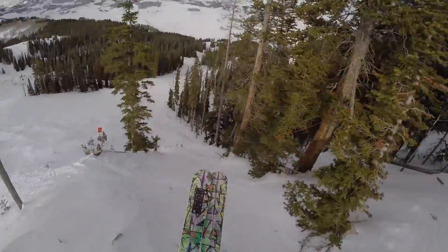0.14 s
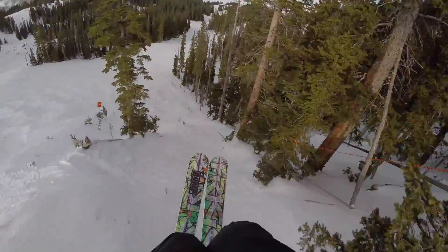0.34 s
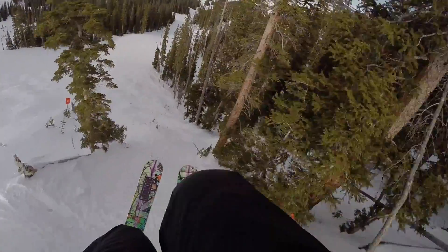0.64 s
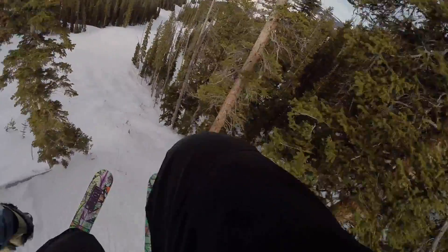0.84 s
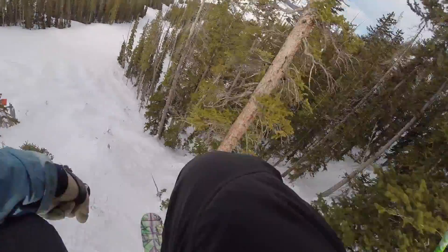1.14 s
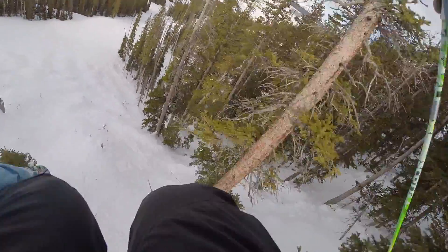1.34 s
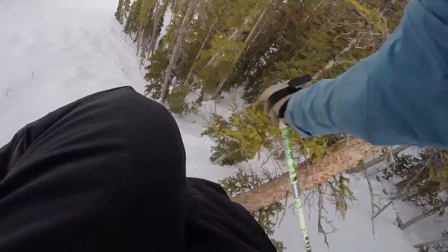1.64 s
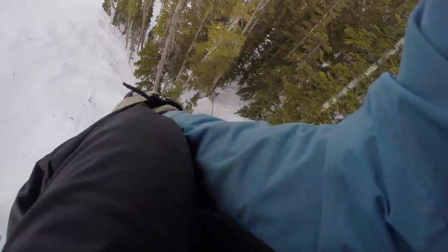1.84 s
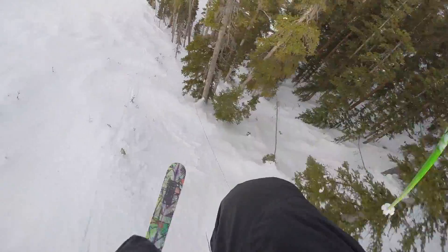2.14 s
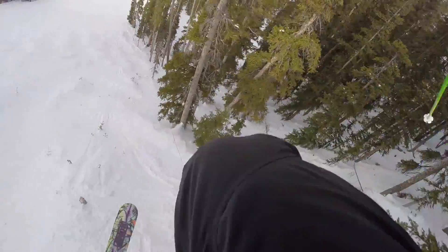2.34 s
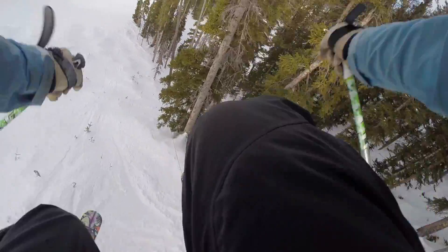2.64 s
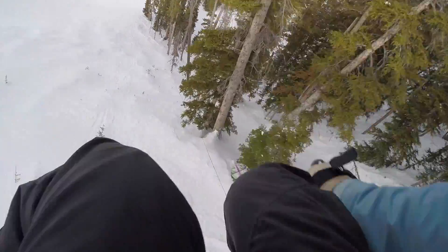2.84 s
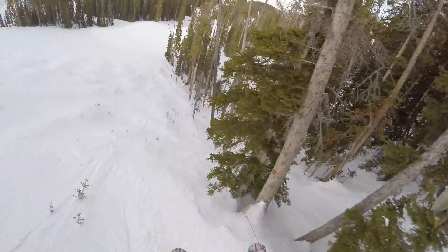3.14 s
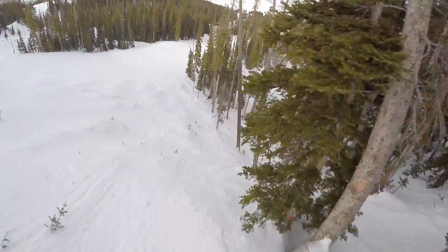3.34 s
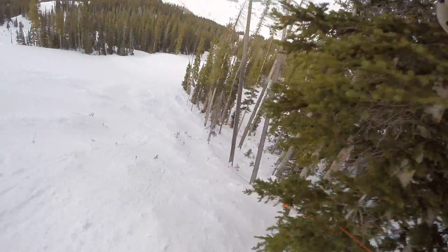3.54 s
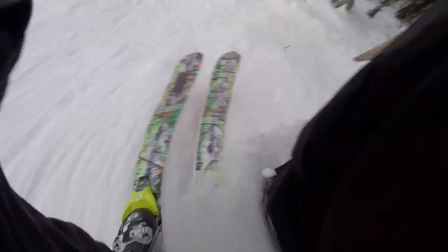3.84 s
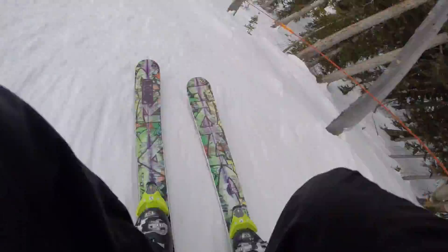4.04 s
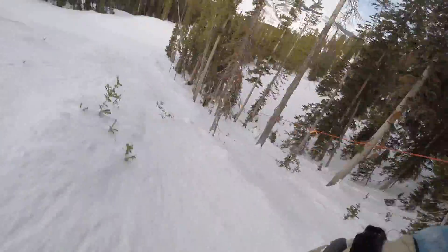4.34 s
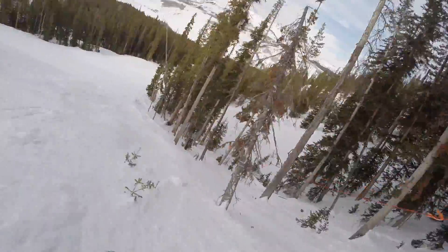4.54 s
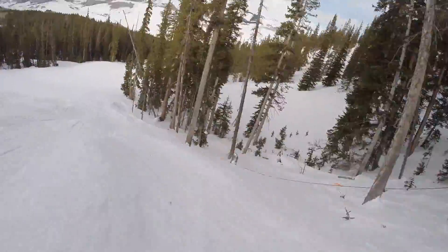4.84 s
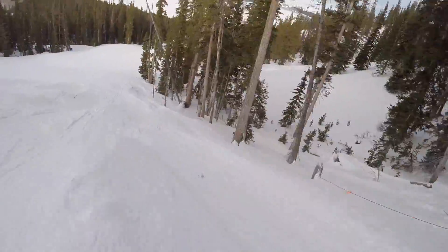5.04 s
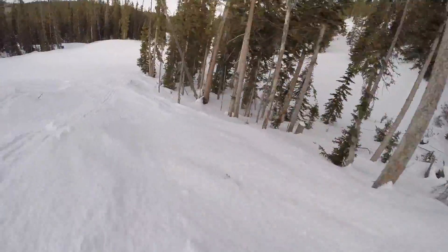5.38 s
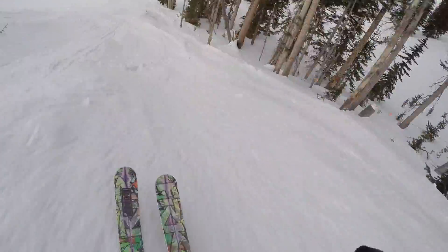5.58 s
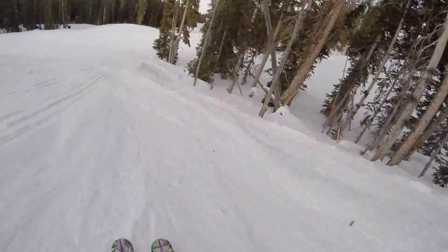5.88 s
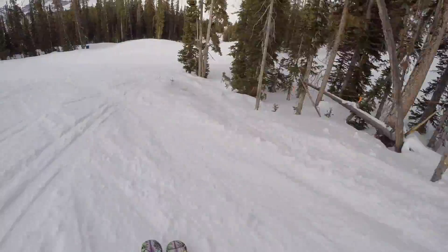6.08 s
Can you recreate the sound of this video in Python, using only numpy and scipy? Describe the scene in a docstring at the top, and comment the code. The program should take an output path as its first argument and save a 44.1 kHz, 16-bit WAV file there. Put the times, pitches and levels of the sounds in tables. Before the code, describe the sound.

Skis on a snowy slope heard through a shaking camera housing. At first everything is half-speed: an opening thump, then faint low scraping, muffled rumbles and sparse hollow knocks. A sudden heavy landing near 3.85 seconds overloads the microphone with bass wind, rapid thuds, plastic clatter and snow crunch. It drops quickly to a brighter normal-speed glide, with dry hiss, short skids, mount bumps, wind puffs and hard clicks. No echo.

```python
"""On a slope of packed snow a skier jumps and skids, a small camera in a plastic housing on the chest.
Wind is lumpy bass noise on the microphone port; the rocking mount booms as wavering narrow-band noise.
Jolts are short dying swings with a plate thud, and contacts strike the resonant modes of the housing.
The skis scrape as coloured noise with a port resonance and throw spray, a bright crackling hiss.
The first seconds are played back at half speed, so everything there is an octave lower and twice as long."""
import sys
import numpy as np
from scipy import signal
from scipy.fft import rfft, irfft, next_fast_len
from scipy.io import wavfile
from scipy.ndimage import uniform_filter1d

SR = 44100
rng = np.random.default_rng(int(sys.argv[2]) if len(sys.argv) > 2 else 0)


def unload_wav(signal):
    """Save mono or channel-first audio to the path in sys.argv[1] as 16-bit WAV at rate SR, clipped to [-1, 1]."""
    wavfile.write(
        sys.argv[1],
        SR,
        np.round(np.clip(np.atleast_2d(signal).T, -1, 1) * 32767).astype(np.int16),
    )


N = 273861   # samples heard
SLOW_UNTIL_S, SLOW_SPEED = 3.8165, 0.5   # heard end of the slow part, and its playback speed
SLOW_COUNT = round(SLOW_UNTIL_S * SR * SLOW_SPEED)   # samples at true speed
TRUE_COUNT = SLOW_COUNT + N - round(SLOW_COUNT / SLOW_SPEED)


def amp(db):
    """Decibel law: a level in dB becomes an amplitude ratio."""
    return 10 ** (np.asarray(db) / 20)


def rms_one(x):
    """Normalisation: the root mean square becomes 1."""
    return x / np.sqrt(np.mean(x ** 2) + 1e-20)


def speed_at(s):
    """Time scaling: playback speed at a heard time."""
    return np.where(np.asarray(s) < SLOW_UNTIL_S, SLOW_SPEED, 1)


def true_time(s):
    """Time scaling: the moment on the slope that is heard at time s."""
    return s - (1 - SLOW_SPEED) * np.minimum(s, SLOW_UNTIL_S)


def curves(rows):
    """Linear interpolation: columns over heard time, read at every sample of true time."""
    s, *columns = np.transpose(rows)
    t = np.arange(TRUE_COUNT) / SR
    return [np.interp(t, true_time(s), column) for column in columns]


def drift(rate_hz):
    """Low-passed noise: a slow random signal of rms 1 that changes about rate_hz times a second."""
    r = np.exp(-2 * np.pi * rate_hz / SR)
    noise = rng.standard_normal(TRUE_COUNT + SR)
    settled = signal.lfilter([1], [1, -2 * r, r * r], noise)[SR:]
    return rms_one(settled)


def coloured(x, spectrum):
    """Spectral shaping: gains in dB, straight between points on a log frequency axis; rms 1."""
    size = next_fast_len(len(x))
    hz, level_db = np.transpose(spectrum)
    grid_hz = np.maximum(np.arange(size // 2 + 1) * SR / size, 1)
    gain_db = np.interp(np.log(grid_hz), np.log(hz), level_db, -99, -99)
    return rms_one(irfft(rfft(x, size) * amp(gain_db), size)[:len(x)])


def evened(x, span_s, share):
    """Level compression: takes a share of the random swings out of the level; rms 1."""
    power = uniform_filter1d(x ** 2, size=round(span_s * SR)) + 0.041
    return rms_one(x / power ** (np.clip(share, 0, 1) / 2))


def ring(x, hz, t60_s):
    """Damped resonance: a unit impulse excites a dying sine of height about 1."""
    r, w = amp(-60 / (t60_s * SR)), 2 * np.pi * hz / SR
    # the tiny offset keeps the filter state out of denormal numbers
    return signal.lfilter([0, np.sin(w)], [1, -2 * r * np.cos(w), r * r], x + 1e-18)


def grit(per_s, spread_db, grain_db):
    """Shot noise: random snow grains of uneven size crack within smooth noise."""
    sizes = amp(spread_db * np.minimum(rng.exponential(1, TRUE_COUNT), 5))
    signs = rng.choice([-1, 1], TRUE_COUNT)
    present = rng.random(TRUE_COUNT) < per_s / SR
    grains = sizes * signs * present
    return rng.standard_normal(TRUE_COUNT) + amp(grain_db) * rms_one(grains)


# wind spectrum at true speed: frequency [Hz], relative density [dB per Hz]
WIND_SPECTRUM = [(12, 7), (25, 9), (60, -1.5), (110, -8.5), (300, -13.5), (500, -34.5), (900, -44.5)]


def wind(gain):
    """Turbulence: eddies on the microphone port make lumpy bass noise."""
    eddies = evened(coloured(rng.standard_normal(TRUE_COUNT), WIND_SPECTRUM), span_s=0.057, share=0.81)
    return gain * rms_one(amp(5.05 * drift(25.0)) * eddies)


def boom(gain, pitch_hz=150, width_hz=60):
    """Randomly driven resonance: the mount rocks near one pitch and shaking makes it waver."""
    turn = 2 * np.pi * pitch_hz * np.arange(TRUE_COUNT) / SR
    rocking = drift(width_hz) * np.cos(turn) + drift(width_hz) * np.sin(turn)
    return gain * evened(rocking, span_s=0.098, share=0.1)


# bumps under the skis, where an edge bites and the mount rocks, as heard:
# middle_s [s], length_s [s], crunch_db [dB], rocking_db [dB]
BUMPS = [(0.108, 0.06, -16.5, -16), (0.23, 0.084, -36, -31), (0.59, .2, -77, -58), (0.91, 0.051, -52, -57),
         (1.213, .12, -61, -38), (1.325, 0.2, -40.5, -44), (1.603, 0.5, -48, -36.5), (1.75, 0.39, -32, -27),
         (1.978, 0.21, -37.5, -29), (2.132, 0.18, -37.5, -33), (2.268, 0.11, -45, -40),
         (2.335, 0.23, -32.5, -34), (2.611, 0.22, -44, -30.5), (2.712, .12, -56.5, -34.5),
         (2.927, 0.17, -41, -30), (3.15, 0.17, -44.5, -42), (3.322, 0.24, -38.5, -60),
         (3.53, 0.26, -42, -35), (3.59, 0.31, -36.5, -38), (3.772, 0.068, -29, -38),
         (3.879, 0.038, -3.5, 4.5), (3.948, 0.029, -15, -2.5), (4.218, 0.12, -35.5, -27),
         (4.345, .08, -47, -30.5), (4.5, 0.033, -29.5, -29), (4.629, 0.093, -36, -19.5),
         (4.745, 0.093, -23, -18), (4.877, 0.27, -47, -31), (5.202, 0.25, -38.5, -41.5),
         (5.32, 0.14, -36, -30), (5.412, 0.052, -28.5, -22.5), (5.471, 0.046, -28, -23),
         (5.538, 0.08, -25, -22), (5.631, 0.073, -22.5, -17), (5.707, .05, -54, -29),
         (5.798, 0.031, -39, -38), (5.875, .05, -41, -30), (5.94, 0.11, -33, -37), (5.993, 0.02, -27, -19)]


def swells(levels_db, share, extra_s):
    """Superposed envelopes: one bell per bump; its width is a share of the length plus extra_s."""
    total, t = 0, np.arange(TRUE_COUNT) / SR
    for (s, length, *_), level_db in zip(BUMPS, levels_db):
        width = (share * length + extra_s) * speed_at(s)
        total = total + amp(level_db) * np.exp(-.5 * ((t - true_time(s)) / width) ** 2)
    return total


# jolts through the mount, as heard: start_s [s], level_db [dB], pitch_hz [Hz], t60_s [s]
MOUNT_JOLTS = [(0.085, -5, 50, 0.04), (0.104, -7, 43, 0.22), (1.659, -9.5, 60.3, 0.016),
               (1.714, -8.5, 117, 0.066), (1.802, -9.5, 92, 0.13), (1.953, -17, 131, 0.14),
               (1.982, -11.5, 166.6, 0.12), (2.225, -12.5, 51, 0.23), (2.275, -16.5, 107, 0.083),
               (3.821, 3, 112, 0.08), (3.852, 6, 98, 0.083), (3.893, 6.5, 138, 0.03),
               (3.914, -6, 102, 0.091), (3.938, 9, 78.5, 0.051), (3.977, 0, 108, 0.022),
               (4.214, -4.5, 92, 0.041), (4.486, -15.5, 157, 0.033), (4.62, -23, 122, 0.058),
               (4.635, -7, 91, 0.11), (4.716, -1, 64.5, 0.094), (4.765, -17, 110, 0.057),
               (5.468, -4.5, 248, 0.026), (5.511, -0.5, 73, 0.051), (5.625, 0.5, 291, 0.04),
               (5.96, -24, 150, 0.022), (5.988, -0.5, 196, 0.023)]
# modes of the harness plate under the mount, at true speed: pitch_hz [Hz], level_db [dB], t60_s [s]
HARNESS_PLATE = [(515, -14, 0.02), (772, -10.5, 0.013), (1080, -17, 0.011)]


def jolts():
    """Free decay: a jolt throws the mount into a short dying swing and the harness plate thuds."""
    out, t = np.zeros(TRUE_COUNT + SR), np.arange(SR // 4) / SR
    rise = 1 - np.exp(-t / 0.0022)
    thud = 0
    for hz, mode_db, t60_s in HARNESS_PLATE:
        thud = thud + amp(mode_db - 60 * t / t60_s) * np.sin(2 * np.pi * hz * t)
    for s, level_db, hz, t60_s in MOUNT_JOLTS:
        speed, at = speed_at(s), round(true_time(s) * SR)
        swing = amp(-60 * t / (t60_s * speed)) * np.sin(2 * np.pi * hz / speed * t)
        out[at:at + len(t)] += rise * amp(level_db) * (swing + thud)
    return out[:TRUE_COUNT]


TICK_COUNT, TICK_SPREAD_DB = 24, 9.5   # spread either way
TICK_OFFSETS_DB = [-4.5, 2, -1.5]   # knock, snap, fizz against the glide


def ticks(glide_db):
    """Random impacts: faint contacts at random moments of random bumps, their level following the glide."""
    luck = rng.random((TICK_COUNT, 5))
    chosen = (luck[:, 0] * len(BUMPS)).astype(int)
    middle, length = np.array(BUMPS)[chosen, :2].T
    s = middle + length * (luck[:, 1] - .5)
    base_db = glide_db[(true_time(s) * SR).astype(int), None]
    level_db = base_db + TICK_SPREAD_DB * (2 * luck[:, 2:] - 1)
    return np.column_stack([s, level_db + TICK_OFFSETS_DB])


# mount and buckle contacts, as heard; levels of the blow to each band of modes:
# start_s [s], knock_db [dB], snap_db [dB], fizz_db [dB]
CONTACTS = [(0.086, -13, -45, -46), (0.093, -40, -27, -23.5), (0.105, -10, -42, -29),
            (0.139, -14.5, -18.5, -23.5), (0.298, -31, -34.5, -38), (0.73, -25, -33.5, -41),
            (1.189, -22.5, -39, -42.5), (1.834, -25.5, -54, -40), (2.228, -23.5, -48, -68),
            (2.273, -21, -39, -46), (2.284, -26, -36, -38), (2.383, -21, -37, -43),
            (2.391, -19, -23.5, -36.5), (2.956, -20, -40, -39), (3.169, -29, -32, -32),
            (3.183, -5, -16, -13.5), (3.57, -26, -30, -38), (3.744, -25, -33, -67), (3.77, -28, -29, -45),
            (3.779, -34, -36, -38), (3.803, -5.5, -17.5, -30), (3.8145, -9, -23, -32),
            (3.817, -3.5, -12, -23), (3.837, -10, -32, -19), (3.855, 6.5, -10, -17), (3.861, -29, -9, -27),
            (3.878, -7.5, -24, -30), (3.897, -4, -21, -38), (3.906, 1.5, -25, -32), (3.94, 3.5, -24, -3.5),
            (3.957, -17, -21, -36), (3.977, -6, -23, -33), (3.998, -34, -26, -20), (4.018, -11.5, -9, -10),
            (4.108, -40, -32, -28), (4.215, -20.5, -30.5, -38), (4.434, -20, -28, -49),
            (4.72, -11, -21.5, -40), (4.764, -14, -25, -25), (4.818, -11, -25.5, -41), (4.955, 5, -2, -17),
            (5.209, -40, -32, -34), (5.379, -18.5, -31, -44), (5.52, -10, -20, -26.5),
            (5.629, -32, -23, -19.5), (5.703, -9, -30, -57), (5.787, -23, -32, -22), (5.926, -26, -41, -30),
            (6.08, -1, 6.5, -19)]
# housing modes at true speed: pitch_hz [Hz], level_db [dB], t60_s [s]
HOUSING_MODES = [(725, -18.5, 0.01), (768, -20.5, 0.022), (990, -15.5, 0.0094), (1810, -9, 0.0094),
                 (2065, -16, 0.043), (2323, -3, 0.012), (2790, 0, 0.0051), (3514, -2.5, 0.011),
                 (4317, 1.5, 0.0082), (5250, -2, 0.0096), (6140, -8.5, 0.013), (7400, -1, 0.0039),
                 (8930, -0.5, 0.0034), (11460, -3.5, 0.0024), (13030, -10.5, 0.0019), (15140, -6, 0.00067)]
# a knock rings the modes below the first bound, a snap those between, a fizz the top
SNAP_FROM_HZ, FIZZ_FROM_HZ = 3200, 7000


def clicks(glide_db, contact_ms=1.0, rough=0.12):
    """Modal excitation: a hard tick with a short rough tail strikes each housing mode with its own strength."""
    s, knock_db, snap_db, fizz_db = np.transpose(np.vstack([CONTACTS, ticks(glide_db)]))
    span = np.arange(300)
    tail = np.exp(-span / (contact_ms * SR / 1000))
    bursts = rough * rng.standard_normal((len(s), len(span))) * tail
    bursts[:, 0] = 1
    at = np.round(true_time(s) * SR).astype(int)[:, None] + span
    luck_db = 1.5 * rng.standard_normal((len(s), len(HOUSING_MODES)))
    out = np.zeros(TRUE_COUNT)
    for k, (hz, mode_db, t60_s) in enumerate(HOUSING_MODES):
        blow_db = knock_db if hz < SNAP_FROM_HZ else snap_db if hz < FIZZ_FROM_HZ else fizz_db
        strength = (-1) ** k * amp(blow_db + mode_db + luck_db[:, k])   # signs alternate between modes
        force = np.zeros(TRUE_COUNT)
        np.add.at(force, at, bursts * strength[:, None])
        out += ring(force, hz, t60_s)
    return out


# spray spectrum at true speed: frequency [Hz], relative density [dB per Hz]
SPRAY_SPECTRUM = [(1500, -14), (3000, -8.5), (6300, -5), (7000, -15), (10000, -12.5), (11000, -18),
                  (14500, -20.5), (16000, -11)]
# sheets of spray that hit the housing at once, as heard: start_s [s], length_s [s], level_db [dB]
SPRAY_SHEETS = [(0.548, 0.22, -57), (1.584, 0.2, -47), (1.962, 0.17, -50.5), (3.844, 0.014, -21.5),
                (3.987, 0.022, -26), (4.017, 0.052, -25.5), (4.493, 0.012, -41), (4.723, 0.035, -49)]


def spray(level_db):
    """Granular noise: snow dust and rustling cloth hiss and crackle; sheets start and stop sharply."""
    gain, t = amp(level_db), np.arange(TRUE_COUNT) / SR
    for s, length, sheet_db in SPRAY_SHEETS:
        gain = gain + amp(sheet_db) * (t >= true_time(s)) * (t < true_time(s + length))
    hiss = coloured(grit(per_s=820, spread_db=24, grain_db=-14.5), SPRAY_SPECTRUM)
    return uniform_filter1d(gain, size=60) * rms_one(amp(2.0 * drift(60.0)) * hiss)


# scrape spectrum at true speed: frequency [Hz], relative density [dB per Hz]
SCRAPE_SPECTRUM = [(300, -5), (500, -13), (850, -8.5), (1200, -16), (1600, -8), (2000, -8), (2600, 1),
                   (3100, -6.5), (6300, -20.5), (7000, -27), (9000, -33)]
PORT_HZ, PORT_WIDTH_HZ = 2380, 320   # cavity behind the microphone port


def scrape(level_db, bite):
    """Friction noise and cavity resonance: edges chatter on snow; a biting edge rings more in the port."""
    raw = coloured(grit(per_s=780, spread_db=-0.5, grain_db=-11.0), SCRAPE_SPECTRUM)
    port_t60_s = np.log(1000) / (np.pi * PORT_WIDTH_HZ)
    cavity = rms_one(ring(raw, PORT_HZ, port_t60_s))
    glide = amp(level_db + 2.17 * drift(110.0)) * (raw + amp(-11.0) * cavity)
    crunch = bite * amp(3 * drift(120.0)) * (amp(-4) * raw + amp(-3) * cavity)
    return glide + crunch


BUFFET_DB, REST_ROCK_DB = -3, -23   # wind stirred by the rocking; rocking by the wind alone
# wind on the port, as heard: start_s [s], level_db [dB]
WIND_GUSTS = [(0.0, -27.5), (0.12, -8.5), (0.24, -36), (1.09, -38), (1.21, -32), (1.5, -40.5), (1.66, -31),
              (2.18, -33), (2.23, -21.5), (2.42, -32.5), (3.79, -24), (3.84, -4.5), (3.96, -8.5),
              (4.03, -29.5), (4.48, -35.5), (4.72, -13), (4.84, -27), (5.21, -31.5), (5.5, -19),
              (5.52, -16.5), (5.78, -25), (6.02, -13.5), (6.11, -23.5), (6.21, -27)]
# steady glide of the skis, as heard: start_s [s], scrape_db [dB], spray_db [dB]
SKI_GLIDE = [(0.0, -39, -52.5), (0.12, -34.5, -47.5), (0.35, -50, -64), (1.57, -48.5, -57),
             (1.8, -48, -53.5), (2.25, -42, -57), (2.37, -49, -58.5), (2.85, -39, -53.5), (3.27, -50, -62),
             (3.51, -46.5, -57.5), (3.91, -30, -45), (4.03, -39, -41.5), (4.27, -48.5, -57.5),
             (4.51, -42, -54), (4.65, -33, -51), (4.81, -37, -47.5), (4.95, -42, -56), (5.17, -44.5, -55.5),
             (5.52, -31.5, -44), (6.21, -37, -49)]


def scene():
    """Superposition, clipping and time scaling: the ride overloads the camera; its first part is stretched."""
    (wind_db,), (glide_db, spray_db) = curves(WIND_GUSTS), curves(SKI_GLIDE)
    _, _, crunch_db, rocking_db = np.transpose(BUMPS)
    bite = swells(crunch_db, share=0.18, extra_s=0)
    rock = swells(rocking_db, share=0.14, extra_s=0.009)
    air = wind(amp(wind_db) + amp(BUFFET_DB) * rock)
    mount = boom(rock + amp(wind_db + REST_ROCK_DB)) + jolts()
    snow = spray(spray_db) + scrape(glide_db, bite)
    snow = signal.sosfilt(signal.cheby2(10, 50, 15400 * 1.02, fs=SR, output="sos"), snow)   # low-pass
    ride = np.clip(air + mount + clicks(glide_db) + snow, -1.0, 1.0)
    ride = signal.sosfilt(signal.cheby2(10, 60, 16462, fs=SR, output="sos"), ride)   # low-pass
    # twice the samples for the same signal: half speed
    slowed = signal.resample_poly(ride[:SLOW_COUNT], 2, 1, window=("kaiser", 10.0))
    return np.concatenate([slowed, ride[SLOW_COUNT:]])[None]


def record(dry):
    """Band limitation: a steep low-pass cuts the top."""
    return signal.sosfilt(signal.cheby2(16, 90, 16462 * 1.03, fs=SR, output="sos"), dry)


dry = scene()
out = record(dry)
unload_wav(out)
```